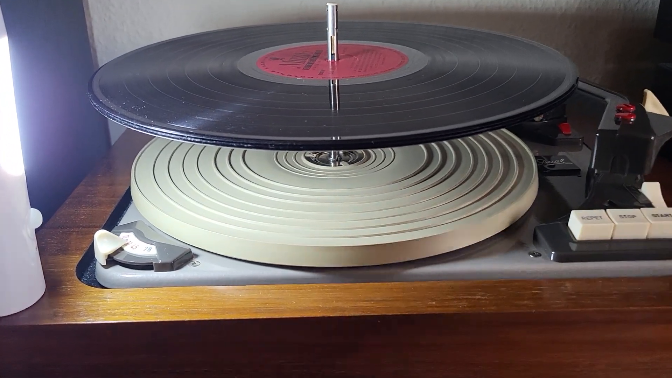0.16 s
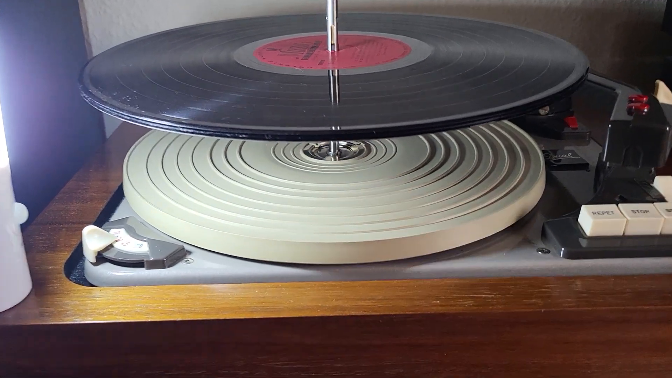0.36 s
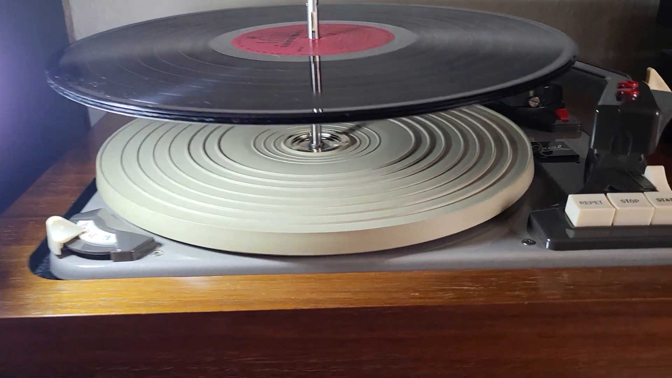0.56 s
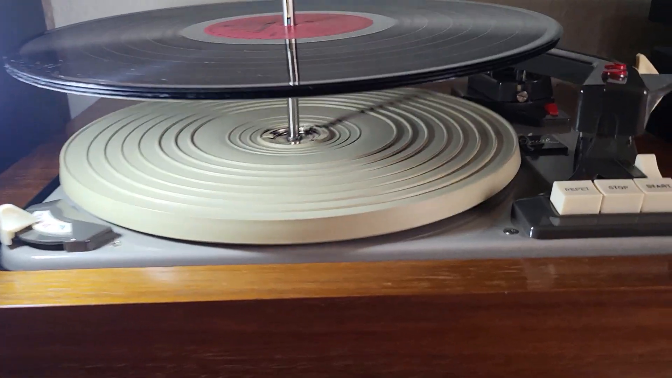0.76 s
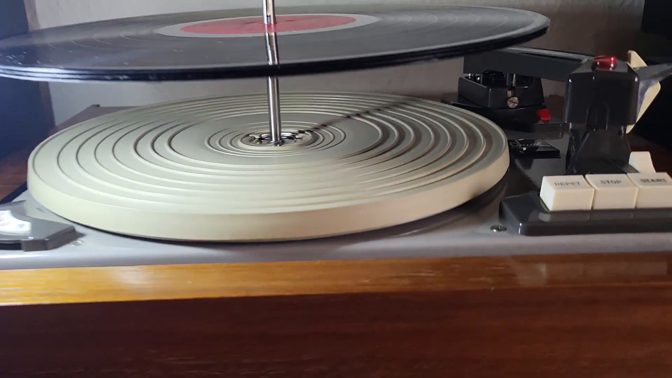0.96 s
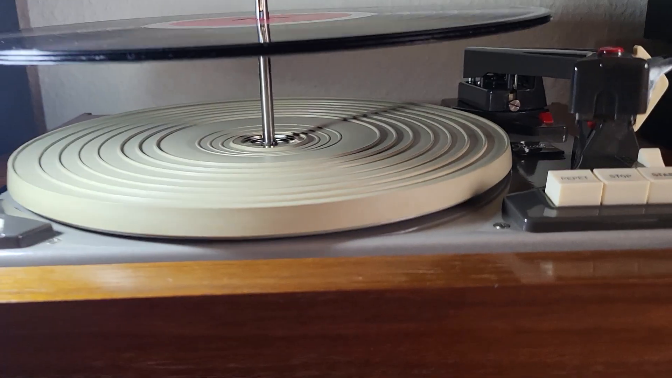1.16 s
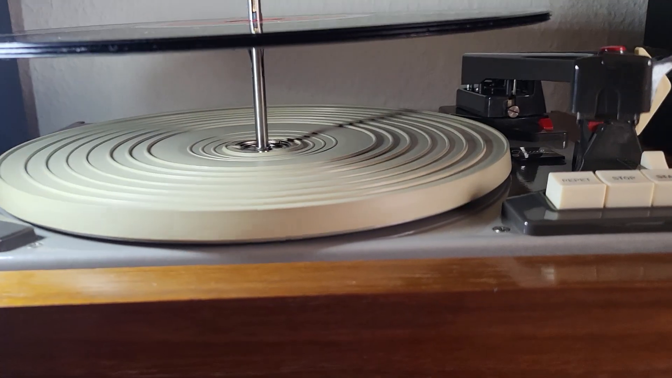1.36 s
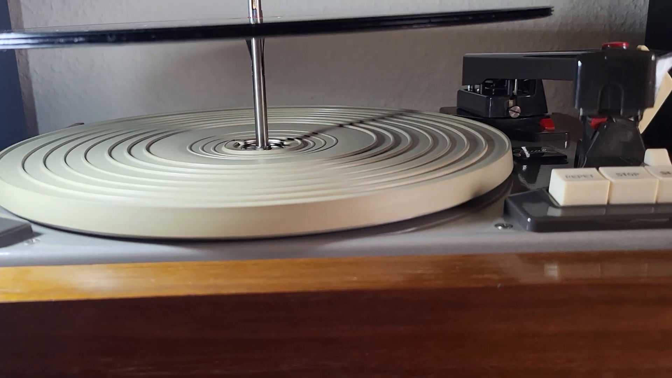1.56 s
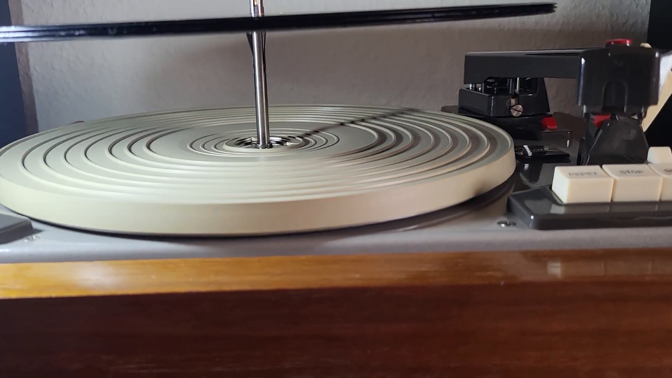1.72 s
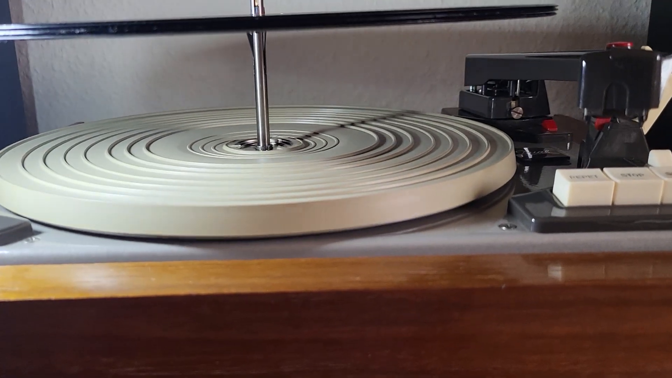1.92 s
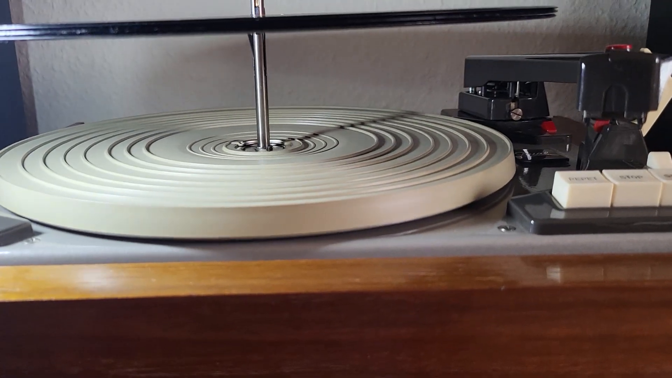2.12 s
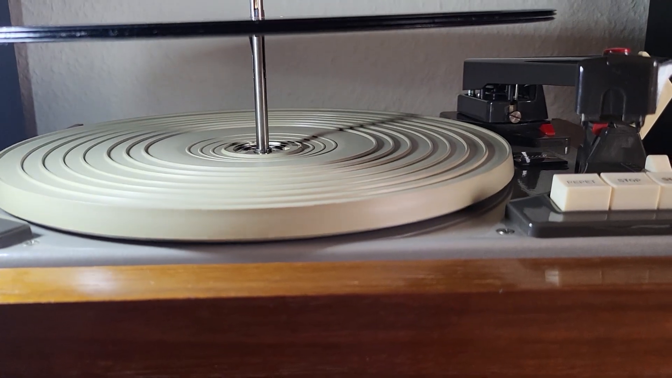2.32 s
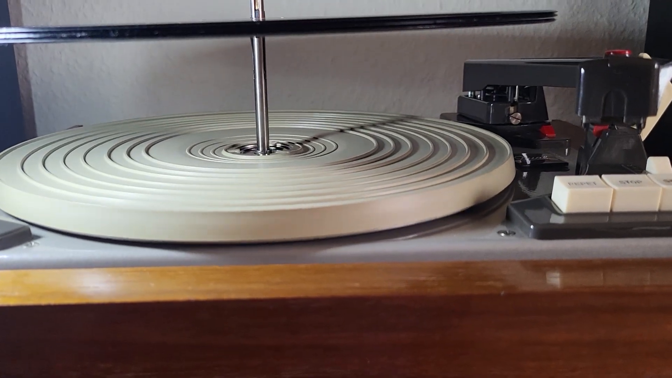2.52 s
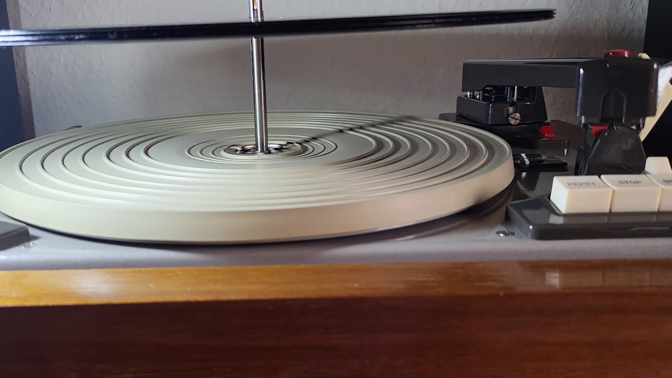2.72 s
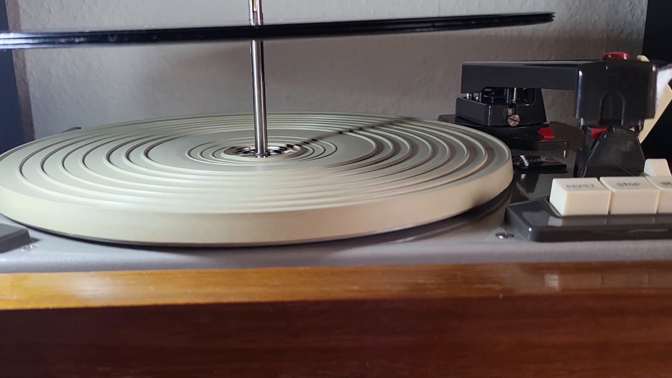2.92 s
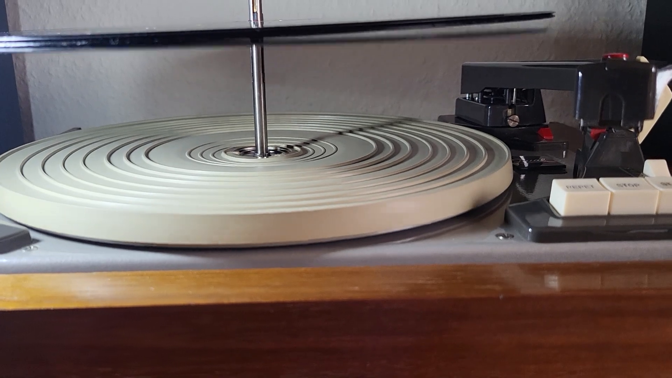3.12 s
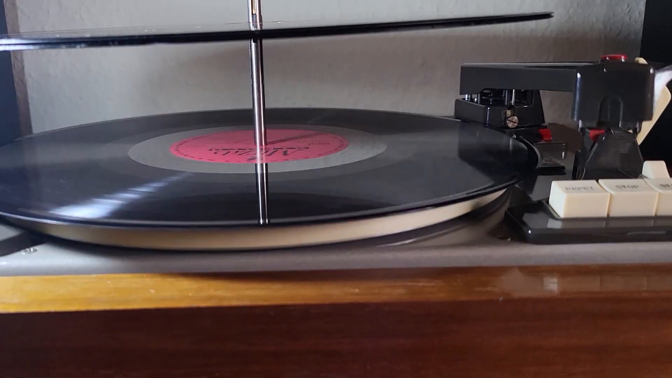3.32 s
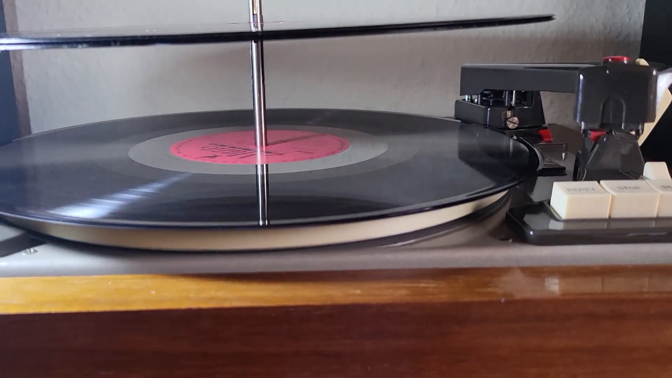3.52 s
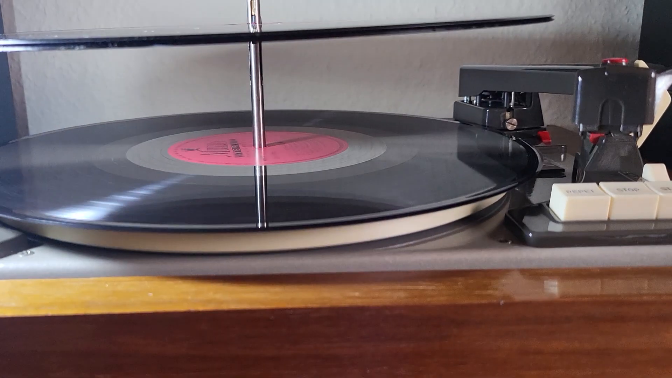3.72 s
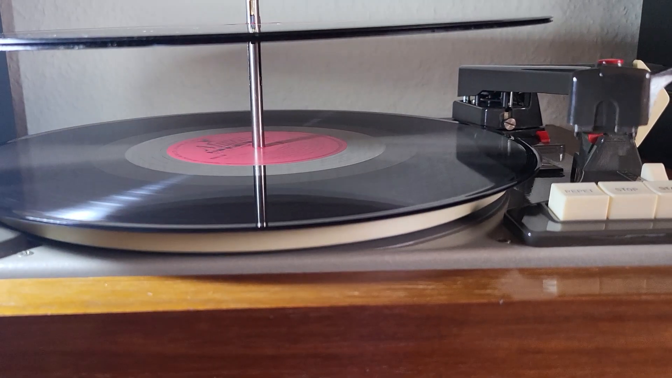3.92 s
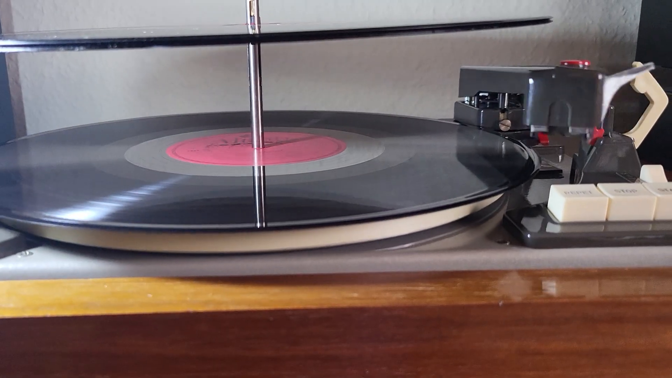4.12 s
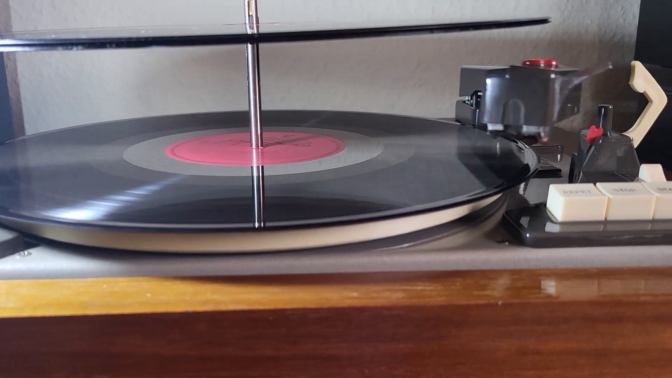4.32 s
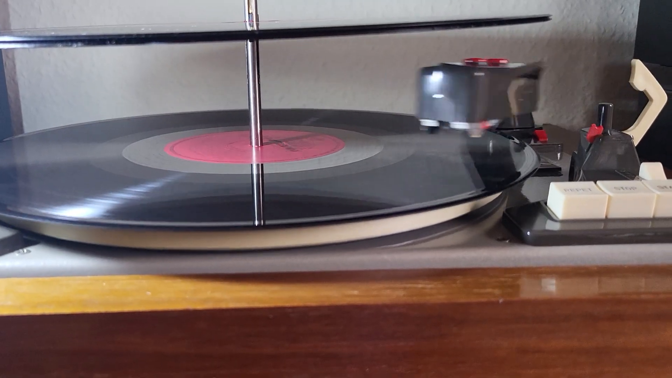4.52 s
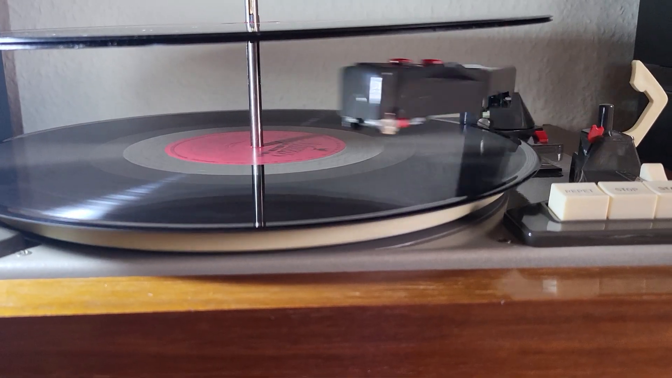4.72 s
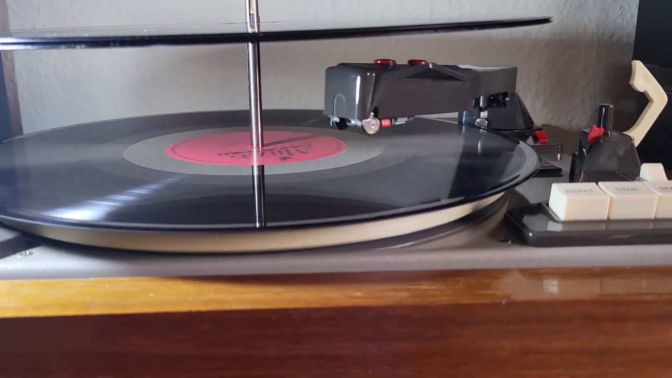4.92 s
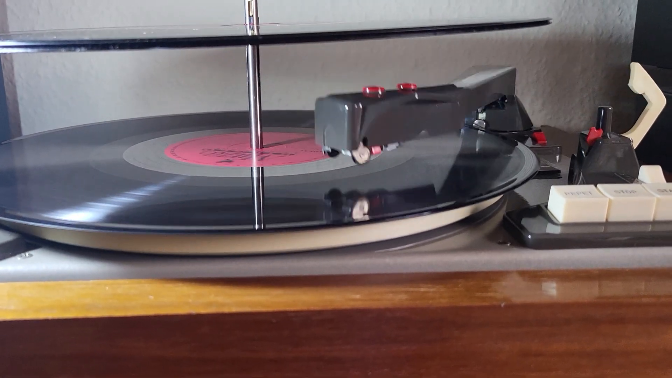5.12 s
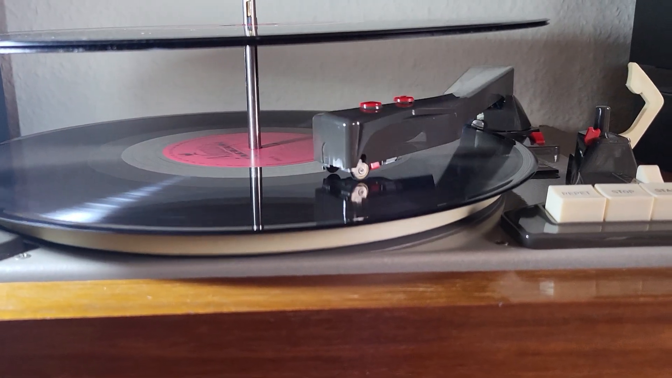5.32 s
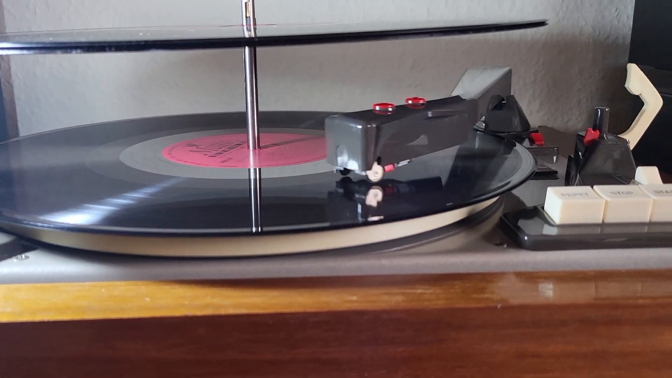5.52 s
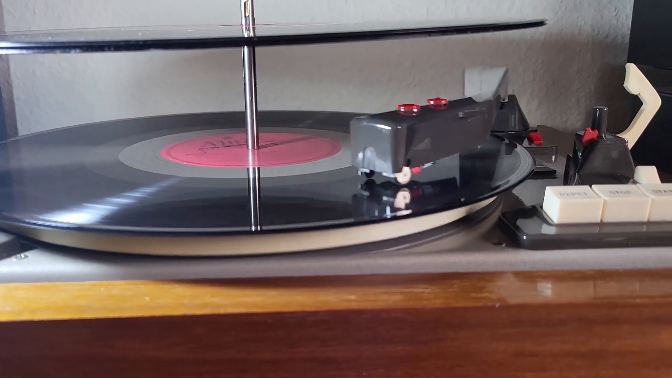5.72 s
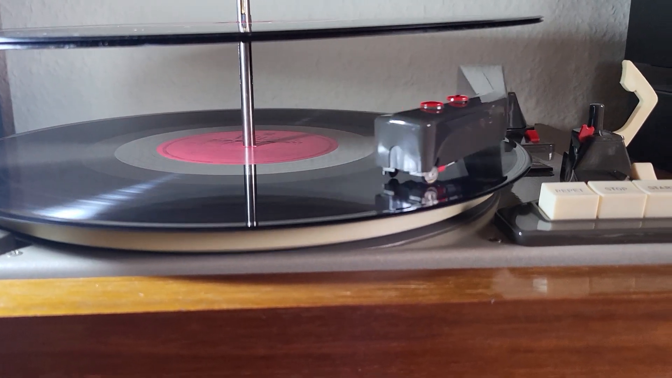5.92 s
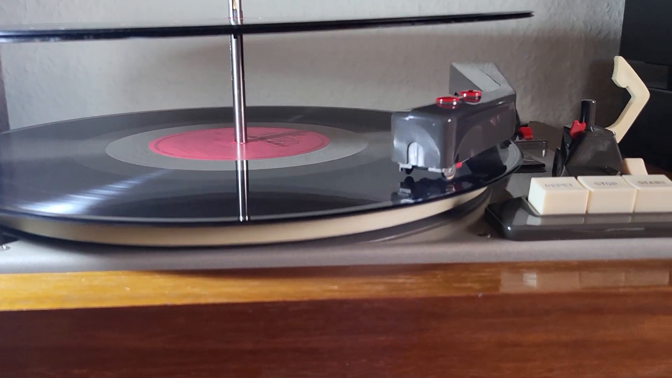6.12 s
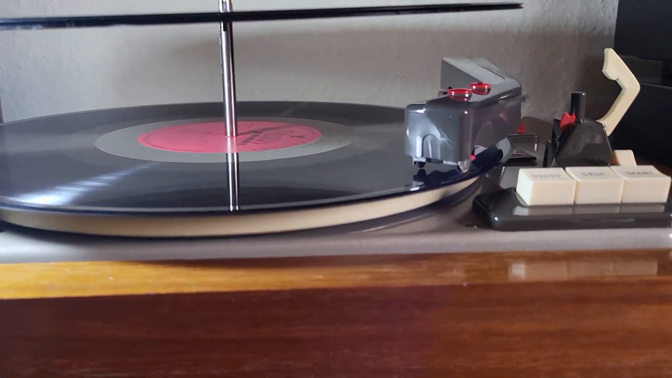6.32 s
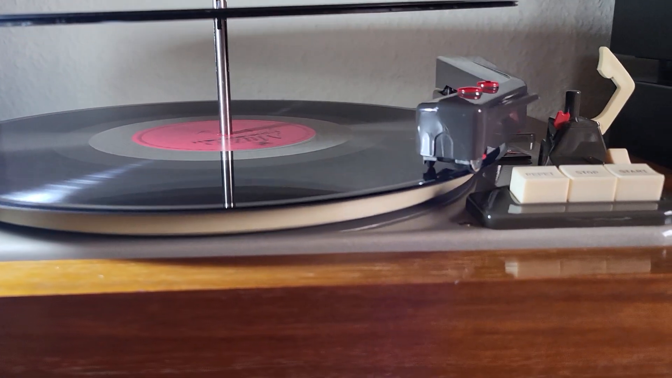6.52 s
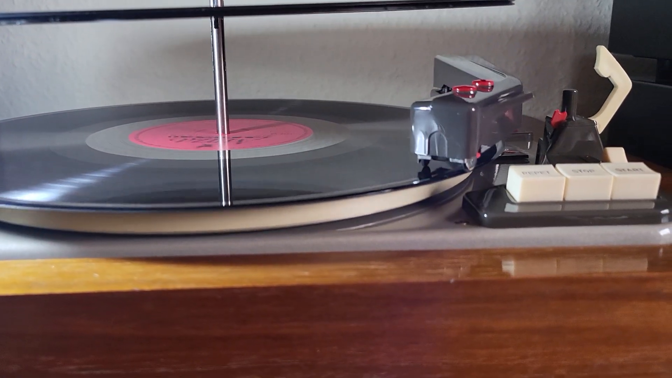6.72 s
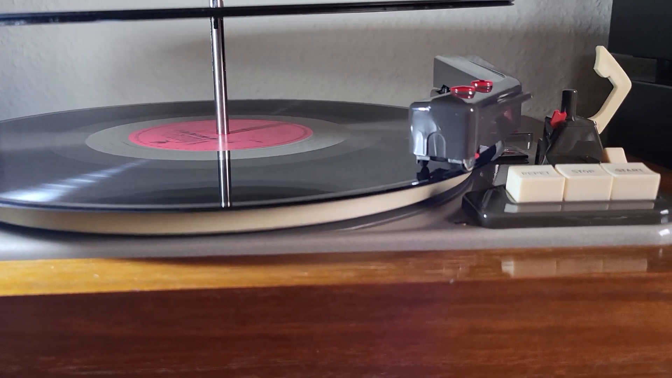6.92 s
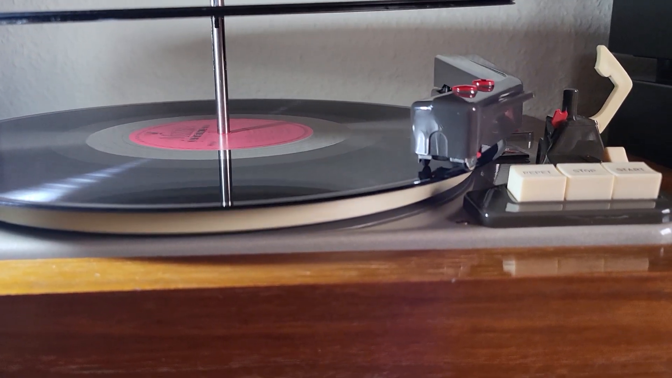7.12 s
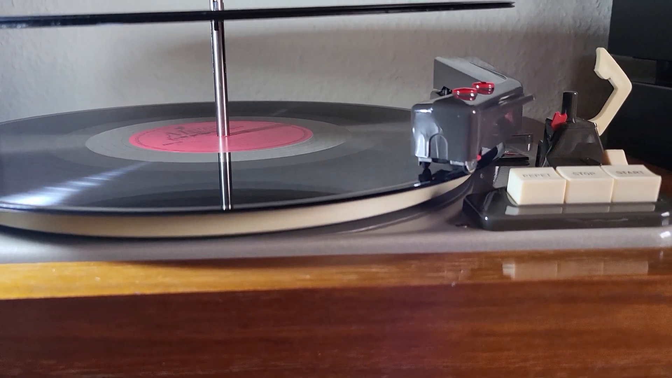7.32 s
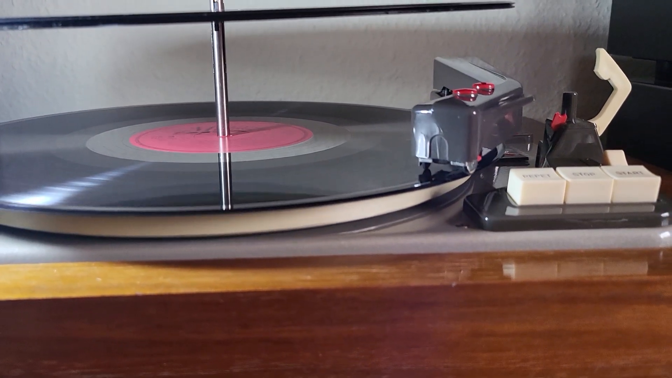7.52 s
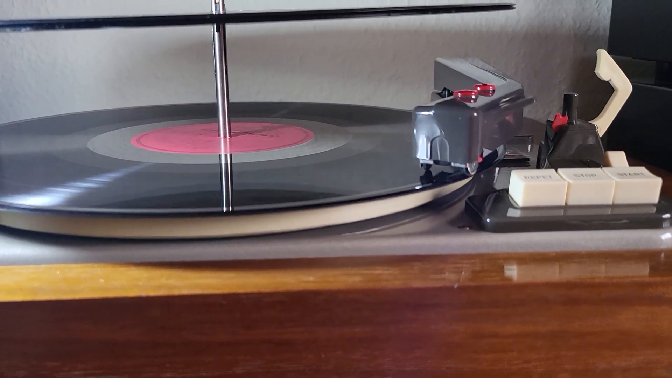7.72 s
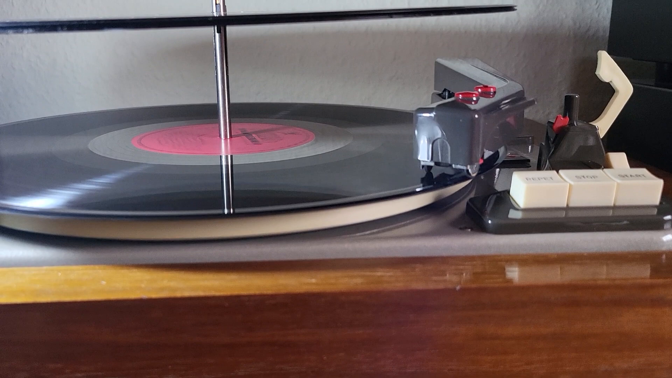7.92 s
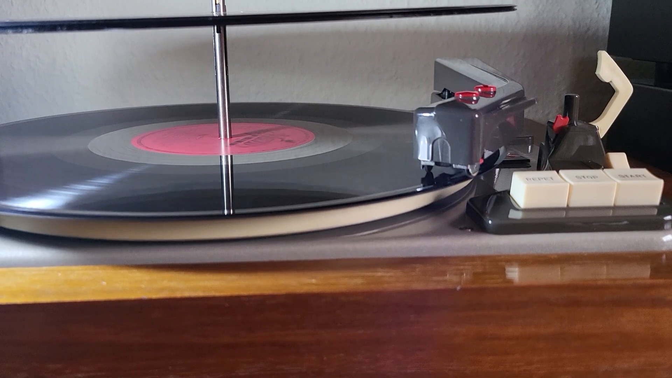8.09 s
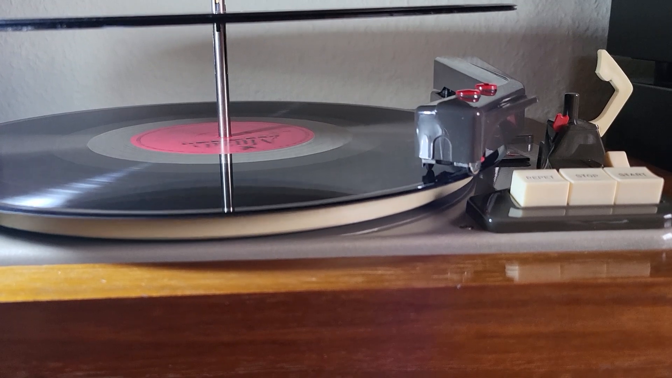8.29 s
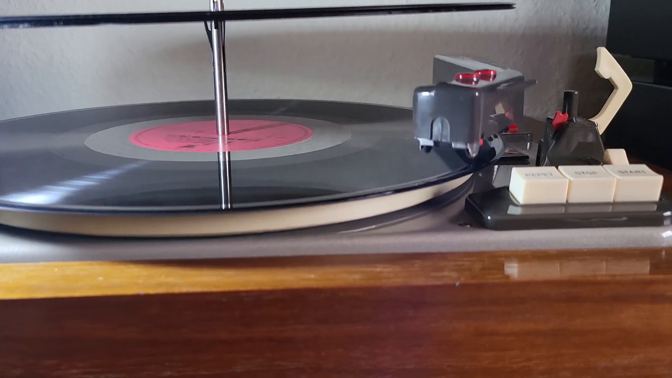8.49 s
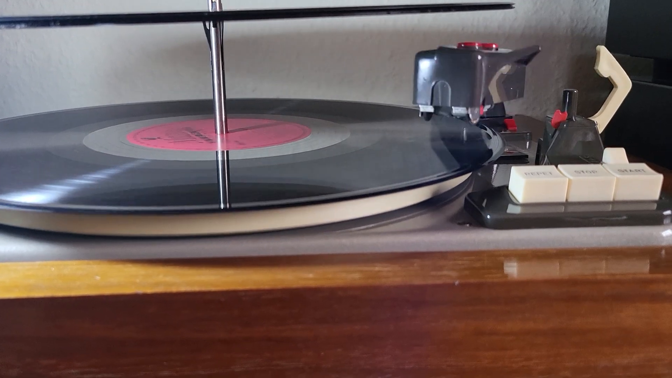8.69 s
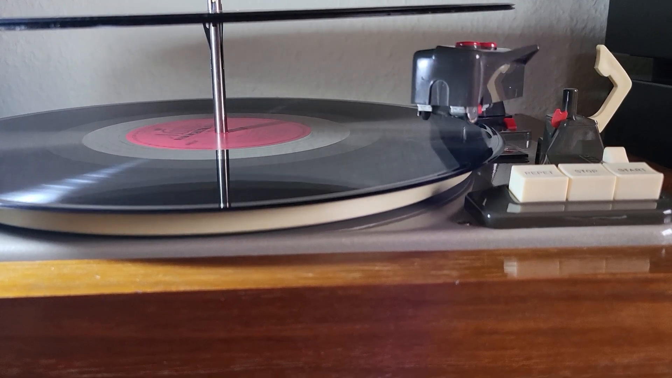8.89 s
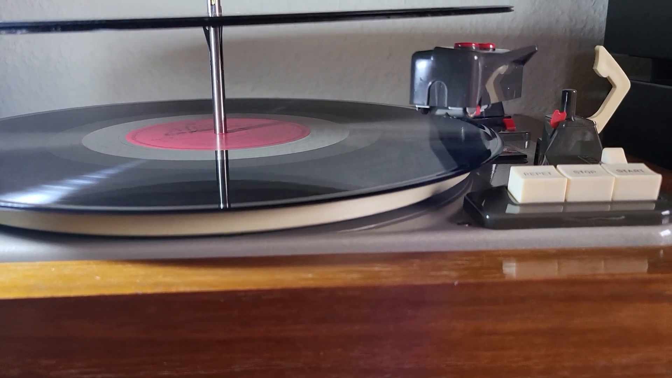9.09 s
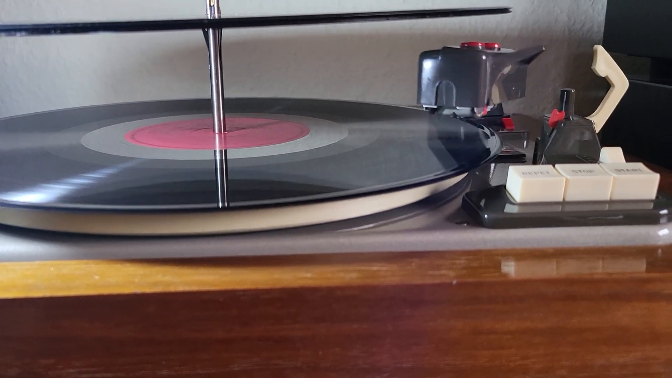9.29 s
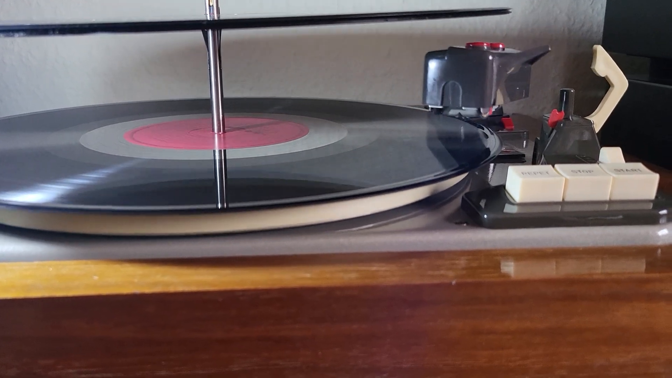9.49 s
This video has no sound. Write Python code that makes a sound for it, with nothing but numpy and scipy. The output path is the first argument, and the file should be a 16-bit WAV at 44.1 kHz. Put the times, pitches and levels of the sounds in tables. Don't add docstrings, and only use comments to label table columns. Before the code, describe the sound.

A vintage automatic record player heard very close in a quiet room. A faint motor hum and airy whirr run throughout. A hard metallic clunk comes first, then a louder double slap as a disc drops onto the platter. The arm scrapes faintly and ticks, light gear clicks gather speed, then coarse uneven ratcheting grinds for two seconds. A bright lever snap and a tiny late click finish it, over slight stereo microphone hiss.

```python
import sys
import numpy as np
from scipy import signal
from scipy.fft import rfft, irfft, next_fast_len
from scipy.io import wavfile
from scipy.ndimage import uniform_filter1d, map_coordinates

SR = 44100
rng = np.random.default_rng(int(sys.argv[2]) if len(sys.argv) > 2 else 0)


def master(y):
    cut = np.clip(np.atleast_2d(y).T, -1, 1)
    pcm = np.round(cut * 32767)
    wavfile.write(sys.argv[1], SR, pcm.astype(np.int16))


def boost(x):
    u = np.asarray(x, float) / 20
    return 10 ** u


N = 421155
T = np.arange(N) / SR
TINY = 1e-12


def unit(x):
    return x / np.sqrt(np.mean(x ** 2) + 1e-20)


def along(points, hz):
    f, v = np.transpose(points)
    return np.interp(np.log(hz + 1), np.log(f + 1), v)


def curve(rows):
    s, db = np.transpose(rows)
    return boost(np.interp(T, s, db, left=-200, right=-200))


def wobble(rate):
    coarse = T[::32]
    knots = rng.standard_normal(int(N * rate / SR) + 4)
    return np.interp(T, coarse, map_coordinates(knots, [coarse * rate]))


def filtered(x, response):
    m = next_fast_len(N + 8192)
    return irfft(rfft(x, m) * response(np.fft.rfftfreq(m, 1 / SR)), m)[..., :N]


def split(bright, dull, split_hz):
    keep = np.exp(-2 * np.pi * split_hz / SR)
    return bright + signal.lfilter([(1 - keep) ** 2], [1, -2 * keep, keep ** 2], dull - bright + TINY)


def rush(colour):
    # (frequency [Hz], likeness [0-1])
    likeness = [(50, .85), (200, 0.75), (600, 0.88), (1700, 0.54), (5000, 0.045)]
    # (frequency [Hz], left over right [dB])
    balance = [(60, 11), (180, 6), (550, 0.5), (1650, 17.5), (4970, -3.5), (15000, -1.5)]
    hz = np.fft.rfftfreq(next_fast_len(N), 1 / SR)
    turn = np.arccos(np.clip(along(likeness, hz), -1, 1)) / 2
    mid, side = rng.standard_normal((2, len(hz))) + 1j * rng.standard_normal((2, len(hz)))
    pair = np.cos(turn) * mid + np.sin(turn) * side * [[1], [-1]]
    gain = boost(along(colour, hz)) * boost(np.outer([.5, -.5], along(balance, hz)))
    return unit(irfft(pair * gain)[:, :N])


def patchy(x, depth_db):
    z = signal.stft(x, nperseg=512)[2]
    field = uniform_filter1d(rng.standard_normal(z.shape[1:]), size=3, axis=0)
    field = uniform_filter1d(field, size=40, axis=1)
    return unit(signal.istft(z * boost(depth_db * unit(field)), nperseg=512)[1][:, :N])


def grit(shape, spiky_db, alike):
    size = boost(spiky_db * np.clip(rng.standard_normal(shape), -2, 2))
    shared, left, right = size * rng.standard_normal((3, shape))
    share = np.clip(alike, 0, 1)
    return unit(share * shared + np.sqrt(1 - share ** 2) * np.array([left, right]))


def drag(gain, spiky_db, alike):
    touch = np.flatnonzero(gain > TINY ** .5)
    x = np.zeros((2, N))
    x[:, touch] = grit(len(touch), spiky_db, alike)
    return x


def tinted(swarm, share):
    hz = np.exp(rng.uniform(np.log(2500), np.log(9000)))
    return unit(swarm + share * unit(signal.lfilter(*signal.iirpeak(hz, 3.5, SR), swarm)))


def contacts(rows, split_hz, rise, edge, pan_db, spiky_db, tint, trail=0):
    trail_s = .018
    bright, dull = np.zeros((2, N + SR)), np.zeros((2, N + SR))
    t = np.arange(SR // 12) / SR
    for s, db, dull_db, length, *own_pan in rows:
        length = max(length, .001)
        fall = np.exp(-(t / length) ** edge) + trail * np.exp(-t / trail_s)
        shape = (1 - np.exp(-t / rise)) * fall
        pan = boost(np.outer([.5, -.5], own_pan or [pan_db]))
        swarm = tinted(grit(len(t), spiky_db, alike=0.65), tint)
        swarm = boost(db) * pan * shape / shape.max() * swarm
        start = round((s - rise / 2) * SR)
        bright[:, start:][:, :len(t)] += swarm
        dull[:, start:][:, :len(t)] += boost(dull_db) * swarm
    return split(bright[:, :N], dull[:, :N], split_hz)


def struck(rows):
    return contacts(rows, split_hz=1000, rise=.001, edge=0.96, pan_db=0, spiky_db=2.5, tint=0.08)


def ring(x, body, broad_db):
    colour, peaks = body
    hz = np.fft.rfftfreq(8192, 1 / SR)
    power = boost(along(colour, hz) + broad_db) ** 2
    for centre, width, db in peaks:
        width = max(width, centre / 40)
        power = power + boost(db) ** 2 / (1 + (2 * (hz - centre) / width) ** 2) ** 2
    cep = irfft(np.log(power + 1e-9) / 2)
    cep[1:4096], cep[4097:] = 2 * cep[1:4096], 0
    h = irfft(np.exp(rfft(cep)))
    return signal.oaconvolve(x, h[None] / np.linalg.norm(h), axes=1)[:, :N]


def modes(rows, attack, rough=.03, apart=.6):
    x = np.zeros((2, N + SR))
    t = np.arange(SR // 2) / SR
    for s, db, hz, t60 in rows:
        steps = rough * (hz / 1200) ** .8 * rng.standard_normal((3, len(t)))
        both, left, right = np.cumsum(steps, axis=1)
        phase = 2 * np.pi * hz * t + both + apart * np.array([left, right])
        decay = boost(db - 60 * t / t60) * (1 - np.exp(-t / attack))
        x[:, round(s * SR):][:, :len(t)] += decay * np.sin(phase)
    return x[:, :N]


def hiss(load, grip):
    # (frequency [Hz], level [dB per Hz])
    hiss_colour = [(290, -39), (500, -3.5), (900, -14), (1500, -15), (2100, -8), (3300, -16), (6000, -18.5),
                   (10500, -21.5), (13500, -18), (16000, -21.5)]
    return boost(-81.5 + 3 + 5.5 * grip) * load ** .2 * rush(hiss_colour)


def rumble(load, grip):
    # (frequency [Hz], level [dB per Hz])
    rumble_colour = [(30, -17), (60, 2.5), (100, -1), (170, -4.5), (260, -11.5), (380, -7.5), (500, -22.5),
                     (1500, -31), (2500, -91.5)]
    turn_s, peak_s, throb_db = .575, 1.76, 3.5
    throb = np.cos(2 * np.pi * (T - peak_s) / turn_s)
    level_db = -74.5 + 3.5 + 11 * grip + throb_db * throb + 2.1 * wobble(11)
    return boost(level_db) * load ** .6 * rush(rumble_colour)


def hum(load):
    # (frequency [Hz], level [dB], drift [Hz], share of the load followed [0-1])
    tones = [
        (49, -66.5, 1.2, .05),
        (200, -82, 3, .8),
    ]
    x = np.zeros(N)
    for hz, db, drift, follows in tones:
        level = boost(db + 3.0 + 2.8 * wobble(17)) * load ** follows
        x = x + level * np.sin(2 * np.pi * np.cumsum(hz + drift * wobble(7.2)) / SR)
    return x * boost([[2.2], [-2.2]])


def whirr(load):
    # (frequency [Hz], level [dB per Hz])
    whirr_colour = [(650, -43), (1100, -7), (1690, -6.5), (2100, -1.5), (2520, -4), (3600, -26),
                    (7920, -120)]
    return boost(-82 + 3.5 + 1.1 * wobble(6.3)) * load * patchy(rush(whirr_colour), depth_db=4)


def motor():
    # (time [s], level [dB])
    effort = [
        (0, 6),
        (.35, -3),
        (2.3, -0.5),
        (2.6, 1),
        (5.15, -1),
        (5.35, 5),
        (6.5, 8),
        (8.4, 7),
        (8.6, 2),
        (9.6, 1),
    ]
    load = curve(effort)
    grip_s, grip_length_s = 0.85, 0.24
    grip = np.exp(-((T - grip_s) / grip_length_s) ** 2)
    return hum(load) + whirr(load) + hiss(load, grip) + rumble(load, grip)


def arm_pivot():
    # (time [s], level [dB])
    scrape = [(4.25, -78), (4.478, -77), (4.506, -63), (4.6, -62), (4.662, -59), (4.75, -59.5), (4.83, -57),
              (4.87, -60)]
    # (frequency [Hz], level [dB per Hz])
    pivot_colour = [(710, -57), (1200, -22), (1300, -52), (1780, -18), (1980, -1), (2360, 1.5), (2490, -13),
                    (2770, -11), (4500, -39), (9900, -120)]
    return curve(scrape) * boost(2.5 * wobble(140)) * rush(pivot_colour)


def rubs():
    # (time [s], length [s], frequency [Hz], width [Hz], level [dB])
    strokes = [(0, 0.022, 2200, 700, -64), (0.698, 0.099, 1240, 130, -70),
               (0.713, 0.03, 10700, 9050, -71.5), (6.05, .49, 5250, 500, -80), (.02, .33, 1600, 700, -78),
               (.71, .065, 330, 100, -63), (1.17, .04, 370, 100, -66), (.28, .32, 2500, 200, -80),
               (1.45, .49, 2500, 200, -81), (2.06, .28, 2100, 200, -75), (2.06, .2, 1600, 300, -78),
               (2.5, .1, 2450, 500, -76), (4.1, .12, 2200, 500, -76), (8.405, .05, 600, 500, -58),
               (8.655, .06, 621, 90, -73), (9.35, .12, 500, 300, -72), (1.5, .33, 110, 90, -72),
               (2.05, .25, 130, 100, -75), (9.08, .42, 90, 60, -69), (.02, .3, 330, 200, -78)]
    brush_times = (1.11, 2.265, 3.99)
    # length [s], frequency [Hz], width [Hz], level [dB]
    brush = (.1, 3880, 450, -86)
    x = np.zeros((2, N + SR))
    t = np.arange(SR // 2) / SR
    for s, length, hz, width_hz, db in strokes + [(s, *brush) for s in brush_times]:
        b, a = signal.iirpeak(hz, hz / width_hz, SR)
        noise = rng.standard_normal((2, SR // 2))
        noise = signal.lfilter(b, a, signal.lfilter(b, a, noise))
        stroke = np.sqrt(np.sin(np.pi * np.clip(t / length, 0, 1)).clip(0))
        x[:, round(max(s, 0) * SR):][:, :len(t)] += boost(db) * stroke * unit(noise)
    return x[:, :N] * boost([[4.5], [-1.5]])


def plinth():
    # (time [s], peak level [dB], frequency [Hz], 60 dB decay [s])
    thuds = [(.57, -39, 61, 0.18), (.72, -50, 90, .12), (.885, -49, 85, .12), (.95, -52, 200, .05),
             (5.5, -52, 94, .2), (2.7, -37.5, 78.5, 0.2), (3.26, -52, 194, 0.7), (3.348, -20.5, 85, 0.071),
             (5.371, -47, 88, 0.08), (7.701, -39, 430, 0.05), (7.705, -43, 560, .04), (7.7, -46, 1080, .08),
             (7.965, -48, 1080, .07), (7.23, -50, 110, .1), (7.25, -52, 200, .12), (7.775, -47, 350, .05),
             (8.302, -43, 540, 0.04), (8.417, -46, 330, 0.05), (8.42, -47, 600, .04), (8.43, -50, 90, .12)]
    # (time [s], peak level [dB], frequency [Hz])
    gear_knocks = [(7.049, -52, 447), (7.09, -54, 603), (7.174, -52, 549), (7.304, -51, 342),
                   (7.348, -50, 425), (7.496, -52, 369), (7.564, -54, 345), (7.671, -50, 554),
                   (7.758, -44, 339), (7.89, -53, 345), (7.925, -51, 353), (7.955, -48, 598),
                   (8.018, -52, 323), (8.345, -49, 549), (8.452, -50, 608)]
    knock_t60_s = .05
    bumps = modes(thuds + [(*row, knock_t60_s) for row in gear_knocks], attack=0.00041)
    return filtered(bumps, lambda hz: (1j * hz / (38 + 1j * hz)) ** 2) * boost([[2.2], [-.2]])


def links():
    # (time [s], peak level [dB], dull part [dB], length [s], left over right [dB])
    tick_rows = [(0.7212, -58, -4, 0.007, -5), (0.847, -48, -21, 0.0045, 4), (0.9482, -60, -7, 0.0034, 9),
                 (1.2017, -60, -6, 0.0063, -2), (4, -61, -8, 0.005, 8), (4.139, -59, -19, 0.0051, 8.5),
                 (4.8345, -40, -4, 0.005, 8), (4.8694, -43, -20.5, 0.005, 3.5), (4.85, -52, 4, .014, 6),
                 (5.047, -43, -3, 0.005, 3), (5.056, -51, 2, .012, 4), (5.0688, -52, 12, 0.008, 4.5)]
    # (frequency [Hz], width [Hz], level [dB])
    link_body = [(150, -48), (250, -12), (618, -6.5), (1240, -8), (2280, -6), (4990, -27), (8120, -15.5),
                 (16000, -25)], [(330, 120, -3), (630, 120, 0), (1076, 120, -2), (2100, 820, 0.5),
                 (3040, 1350, -7.5)]
    return boost(-3.5) * ring(struck(tick_rows), link_body, broad_db=-1.5)


def springs():
    # (time [s], peak level [dB], dull part [dB], length [s], left over right [dB])
    flicks = [
        (3.2328, -55, -10, .004, 0),
        (3.2602, -58, -10, .004, 0),
        (3.2927, -60, -10, .006, 0),
        (5.047, -50, -10, .004, 3),
        (5.2787, -56, -10, .003, 2),
        (5.4497, -56, -10, .005, 2),
        (8.343, -49, -10, .007, 1),
        (9.018, -25, -10, .008, 0),
    ]
    # (frequency [Hz], width [Hz], level [dB])
    steel = [(1500, -30), (4000, -12), (8000, -8), (12000, 0), (16000, -4)], [(12800, 1500, 0)]
    return ring(struck(flicks), steel, broad_db=0)


def ringing_parts():
    # (time [s], peak level [dB], frequency [Hz], 60 dB decay [s])
    ringing_tones = [(.848, -45, 2050, 0.03), (1.197, -54, 1850, 0.04), (3.226, -58, 8900, .12),
                     (2.698, -16.5, 510, 0.05), (3.222, -50, 2150, 0.04), (3.226, -48, 720, 0.08),
                     (3.228, -54, 441, 0.3), (3.336, -21, 1946, 0.04), (4.835, -44, 2510, .02),
                     (4.835, -35, 8100, .02), (3.35, -7, 1100, .034), (5.37, -30, 2290, 0.035),
                     (5.37, -41, 610, .04), (5.372, -42, 1075, .05), (7.688, -28, 2170, 0.021),
                     (8.343, -35, 2100, .035), (9.343, -41, 8600, .025), (8.74, -60, 621, .08),
                     (7.778, -41, 2300, 0.032), (8.298, -38.5, 944, 0.025), (8.998, -24, 2180, 0.025),
                     (9.002, -33, 2250, .06), (9.017, -36, 598, 0.12),
                     (2.698, -19.5, 1740, .09), (2.706, -24, 1910, .08), (2.701, -22, 2095, .1),
               (2.701, -25, 2550, .08), (2.706, -29, 1085, .08), (2.7, -30, 280, .07), (2.7, -33, 876, .06),
               (2.706, -35, 1373, .05), (2.714, -28, 545, .17), (2.72, -37, 340, .15),
               (3.229, -43, 2035, .12), (3.226, -50, 1071, .1), (3.24, -58, 775, .3),
               (3.235, -54, 1782, .15), (3.331, -9, 1830, .022), (3.334, -20, 1340, .1),
               (3.332, -24, 7970, .03), (3.35, -24, 7970, .03), (3.349, -24, 385, .17),
               (3.39, -33, 1500, .18), (3.378, -24, 2100, .04), (3.348, -26, 700, .04),
               (3.348, -21, 500, .035), (3.349, -26, 190, .05), (3.357, -26, 1570, .12),
               (3.36, -25, 2025, .1), (3.37, -32, 1370, .25), (9.017, -23, 2065, .1),
               (9.017, -32, 2800, .07), (9.019, -23, 5600, .05), (9.022, -25, 5230, .04),
               (9.021, -21, 7950, .045), (9.025, -44, 370, .12), (9.018, -42, 1070, .06)]
    return modes(ringing_tones, attack=0.00069) * boost([[2.5], [-2.5]])


def teeth(rows):
    x = contacts(rows, split_hz=4520, rise=0.004, edge=3.2, pan_db=2, spiky_db=5.5, tint=0.35, trail=.17)
    return boost(-3.5) * x


def idling_gear():
    # (time [s], peak level [dB])
    idle_teeth = [(5.5952, -52), (5.6685, -56), (5.7084, -66), (5.7269, -61), (5.7384, -55), (5.8067, -56),
                  (5.8314, -63), (5.8726, -55), (5.9369, -56), (5.9988, -53), (6.0214, -58), (6.0606, -51),
                  (6.122, -49), (6.1843, -54), (6.2094, -59), (6.2397, -50), (6.2996, -50), (6.323, -54),
                  (6.3525, -50), (6.3734, -57), (6.3959, -57), (6.4348, -54), (6.4544, -56), (6.4794, -59),
                  (6.5191, -57)]
    dull_db, brighter_db_per_s, length_s = 6, 10, .014
    first_s = idle_teeth[0][0]
    idle = teeth([(s, db - 7, dull_db - brighter_db_per_s * (s - first_s), length_s) for s, db in idle_teeth])
    pawl_s, pawl_rise_s, pawl_hz, pawl_gain = 5.9, .2, 5350, 3.0
    riding = np.clip((T - pawl_s) / pawl_rise_s, 0, 1)
    idle = idle + pawl_gain * riding * signal.lfilter(*signal.iirpeak(pawl_hz, 6, SR), idle + TINY)
    return idle + 1.8 * signal.lfilter(*signal.iirpeak(3500, 3, SR), idle + TINY)


def catches(rows, dull_db):
    rebound_s, sharpens = 0.016, .5
    both = [(s, db, length) for s, db, length, *_ in rows]
    both += [(s + rebound_s, db + back[0], length) for s, db, length, *back in rows if back]
    return [(s, db, dull_db - sharpens * (db + 36.5), length) for s, db, length in both]


def cam_rubbing(loaded):
    # (time [s], level [dB])
    pressure = [
        (5.25, -94),
        (5.385, -66),
        (5.52, -70),
        (5.65, -76),
        (6.53, -67),
        (6.66, -57.5),
        (6.8, -58),
        (7.02, -65),
        (8.3, -65),
        (8.5, -85),
    ]
    bright = curve(pressure)
    dull = boost(np.where(loaded, -62.5, -67)) * (bright / boost(-65)) ** 0.2
    rough = drag(bright, spiky_db=8.0, alike=0.81) * boost([[-1.5], [-4.5]])
    bright_part = boost(5.5) * bright * boost(3.0 * wobble(70)) * rough
    dull_part = boost(7.5) * dull * boost(4.1 * wobble(45)) * rough
    return split(bright_part, dull_part, split_hz=1300)


def cam():
    # (time [s], peak level [dB], dull part [dB], length [s])
    engage = [
        (5.2787, -44, 2, 0.0094),
        (5.3268, -42, -2.5, 0.01),
        (5.3676, -49, 15, 0.012),
        (5.4333, -49.5, 0, 0.012),
        (5.4497, -41, -8, 0.0074),
        (5.4746, -47, 2, 0.0087),
        (5.5055, -50.5, 1, 0.0085),
        (5.5412, -42.5, -12, 0.007),
        (5.5726, -52.5, 2.5, 0.012),
    ]
    # (time [s], peak level [dB], length [s], rebound [dB] if any)
    bite = [(6.562, -26.5, 0.018), (6.607, -34.5, 0.014), (6.622, -38, .016), (6.64, -33, 0.02),
            (6.673, -31, 0.013, -10), (6.712, -38.5, 0.025), (6.733, -38, .012), (6.744, -30, 0.016),
            (6.77, -32, .01, 0.5), (6.822, -30.5, 0.014), (6.841, -34, .012), (6.865, -28.5, 0.0095),
            (6.897, -28.5, 0.013), (6.911, -34, .012), (6.946, -42, .01)]
    # (time [s], peak level [dB], length [s], rebound [dB] if any)
    rake = [(6.971, -43, 0.0097, 4), (7.042, -40, 0.021), (7.097, -52, .01, 10), (7.161, -42.5, 0.013, 5.5),
            (7.2, -40, 0.0065), (7.226, -33, 0.014, -7), (7.301, -38, 0.016, -5), (7.36, -38, 0.019),
            (7.384, -40, 0.022, -7), (7.476, -44, 0.022), (7.515, -47, .03, -6), (7.555, -39, 0.011),
            (7.616, -43.5, 0.0098, 0.5), (7.66, -41.5, 0.029, -3.5), (7.73, -49.5, 0.025, 7),
            (7.79, -38, .018, -2), (7.885, -38, 0.011, -1.5), (7.926, -35, 0.009, -6),
            (7.998, -42.5, 0.0076, 2.5), (8.082, -42.5, .01, 3), (8.128, -41, .009, -3),
            (8.186, -46.5, 0.017, 1), (8.243, -36, .01), (8.323, -44.5, 0.016, 8), (8.381, -41, 0.0086),
            (8.453, -40, 0.0072)]
    # (frequency [Hz], width [Hz], level [dB])
    free_body = [(120, -46), (200, -8.5), (612, -8.5), (791, -16.5), (1080, -10.5), (1230, -2),
                 (3190, -5.5), (4430, -35), (5230, -15), (16000, -33)], [(319, 45, 2), (604, 68, -3),
                 (1070, 70, 5), (1700, 100, 3), (3480, 730, -5), (5270, 720, -19.5), (6610, 240, -38)]
    loaded_body = [(120, -30), (200, -8), (548, 4), (821, -5.5), (1060, -1), (2170, 3.5), (4520, -13.5),
                   (5230, -13), (16000, -28)], [(331, 147, 4), (560, 84, -13.5), (1077, 65, 6.5),
                   (1695, 70, -1), (2203, 120, 3), (3200, 300, -3), (3650, 350, -2), (5150, 350, -7),
                   (5600, 400, -10), (8260, 1260, -18), (13340, 2400, -18)]
    loaded = T > bite[0][0]
    bed = cam_rubbing(loaded)
    free = ring(teeth(engage) + idling_gear() + bed * ~loaded, free_body, broad_db=-1.5)
    caught = teeth(catches(bite, dull_db=-10) + catches(rake, dull_db=-15))
    return free + ring(caught + bed * loaded, loaded_body, broad_db=-3)


def latch():
    # (time [s], peak level [dB], dull part [dB], length [s], left over right [dB])
    trip = [
        (2.6986, -9, -5, 0.0058, 0.5),
        (2.7034, -18.5, -6.5, 0.0025, 5),
        (2.7082, -13, -12, 0.0057, 2.5),
    ]
    # (frequency [Hz], width [Hz], level [dB])
    latch_body = [(90, -45), (150, -14.5), (700, -9.5), (1300, -14.5), (3000, -13), (4500, -19.5),
                  (8000, -28.5), (13000, -26.5), (16500, -32.5)], [(500, 300, -5), (1950, 1100, -8)]
    return boost(-6.5) * ring(struck(trip), latch_body, broad_db=1.5)


def disc():
    # (time [s], peak level [dB], dull part [dB], length [s], left over right [dB])
    falls = [
        (3.2261, -47, 9.5, 0.006, 9.5),
        (3.3318, -9, -26, 0.003, 5),
        (3.3405, -20, -8, .005, 3),
        (3.349, -9, -12, 0.0035, 3.3),
        (3.3657, -15.5, -12, 0.008, 3.6),
        (3.3773, -24, -11, 0.006, 3.2),
    ]
    # (time [s], level [dB])
    slide = [(3.215, -66.5), (3.229, -55), (3.3, -64), (3.325, -66)]
    # (frequency [Hz], width [Hz], level [dB])
    disc_body = [(90, -40), (150, -10.5), (400, -8), (800, -20), (1500, -6), (3300, -13), (8000, -20),
                 (13000, -29.5), (16500, -34)], [(1130, 220, -2), (1900, 600, -5), (5350, 560, -21)]
    gain = curve(slide)
    slip = gain * drag(gain, spiky_db=1.0, alike=.7)
    return ring(boost(-6.5) * struck(falls) + boost(-4) * slip, disc_body, broad_db=4)


def lever():
    # (time [s], peak level [dB], dull part [dB], length [s], left over right [dB])
    snap = [
        (8.345, -37, -20, 0.0077, 1.5),
        (8.998, -25, -17, 0.0067, 2),
        (9.008, -33, -12, 0.0047, 0),
        (9.0165, -6.5, -27, 0.012, -0.5),
        (9.343, -42, -11, 0.0085, 4.5),
    ]
    # (frequency [Hz], width [Hz], level [dB])
    lever_body = [(88, -67.5), (150, -18), (589, -17), (1210, -18), (1940, -5), (4490, -10), (5150, -9),
                  (8230, -8.5), (16000, -11.5)], [(2050, 450, -1), (2780, 250, -11), (5460, 700, -4.5),
                  (8100, 1100, -2), (9600, 400, -16)]
    x = contacts(snap, split_hz=850, rise=.003, edge=2.0, pan_db=0, spiky_db=2.0, tint=0.11)
    return boost(-10.5) * ring(x, lever_body, broad_db=3.5)


def room(x):
    # (frequency [Hz], 60 dB decay [s])
    decay_times = [(100, 0.52), (600, 0.4), (1300, 0.47), (5000, 0.37), (12000, 0.26)]
    hz, t, z = signal.stft(rng.standard_normal((2, SR * 3 // 4)), SR, nperseg=256)
    apart = (hz / (hz + 450))[:, None]
    z = np.array([z[0] + apart * z[1], z[0] - apart * z[1]]) / np.sqrt(1 + apart ** 2)
    fading = boost(-60 * t / along(decay_times, hz)[:, None])
    tail = signal.istft(z * fading, SR, nperseg=256)[1]
    tail = np.pad(tail / np.linalg.norm(tail[0]), ((0, 0), (200, 0)))
    return signal.fftconvolve(x, tail, axes=1)[:, :N]


def ports(x):
    # (frequency [Hz], left over right [dB])
    shade = [(100, 0), (700, 0), (1300, -1), (2400, 5), (4400, -2), (8000, 0), (15000, 0)]
    narrow_hz, early_s = 420, .00018

    def lead(hz):
        lean_db = along(shade, hz) + 1.2 * narrow_hz / (hz + narrow_hz)
        return np.exp(1j * np.pi * np.outer([1, -1], hz) * early_s) * boost(np.outer([.5, -.5], lean_db))

    mid = x.mean(axis=0)
    side = filtered((x[0] - x[1]) / 2, lambda hz: hz ** 2 / (hz ** 2 + narrow_hz ** 2))
    return filtered(np.array([mid + side, mid - side]), lead)


def scene():
    floor = motor() + arm_pivot() + rubs()
    bumps = plinth()
    pings = ringing_parts()
    chatter = cam()
    blows = links() + springs() + latch() + disc() + lever()
    wet = room(boost(-8) * blows + boost(-17) * pings + boost(-10) * chatter + boost(-10) * bumps)
    return ports(blows + pings + chatter + wet) + bumps + floor


def top_cut(x):
    return signal.sosfilt(signal.butter(12, 16820, fs=SR, output="sos"), x)


def record(dry):
    # frequency [Hz], width [Hz], gain
    port_hz, width_hz, gain = (8000, 1300, 1.1)
    top_hz = 15950

    def response(f):
        cavity = 1 + gain * 1j * f * width_hz / (port_hz ** 2 - f * f + 1j * f * width_hz)
        return cavity / (1 + np.exp(np.clip((f - top_hz) / 60, -50, 50)))

    x = filtered(dry, response)
    mix = x / (1 + np.abs(x / .8) ** 4) ** (1 / 4)
    return top_cut(mix)


dry = scene()
out = record(dry)
master(out)
```